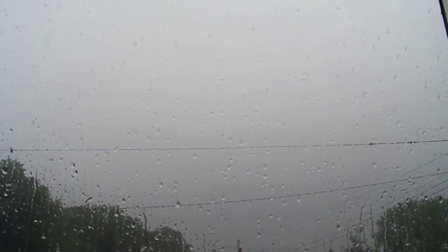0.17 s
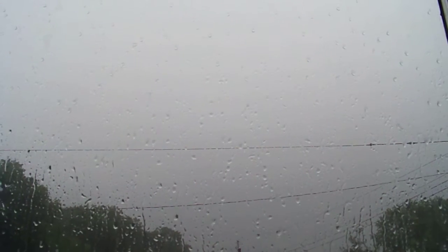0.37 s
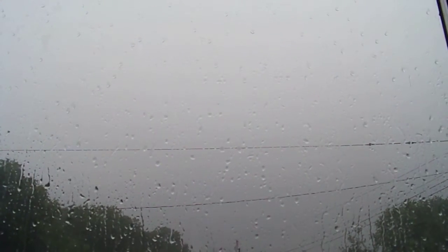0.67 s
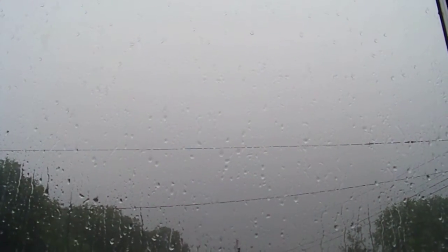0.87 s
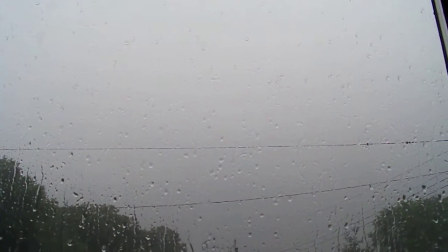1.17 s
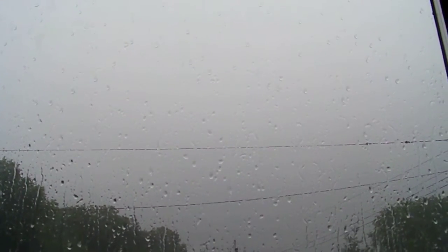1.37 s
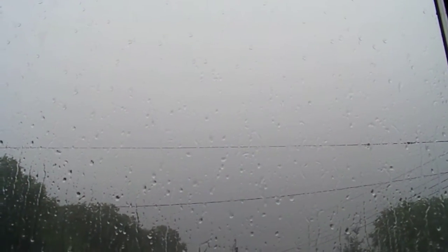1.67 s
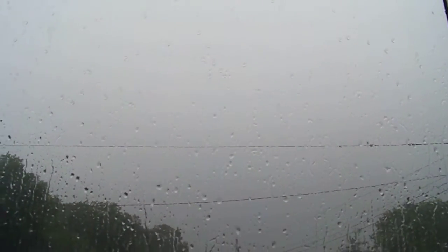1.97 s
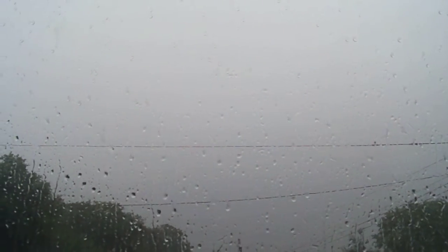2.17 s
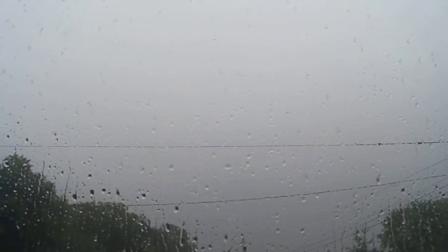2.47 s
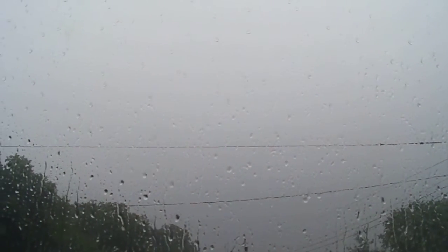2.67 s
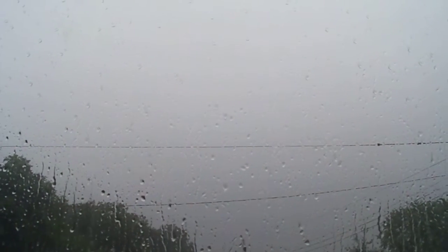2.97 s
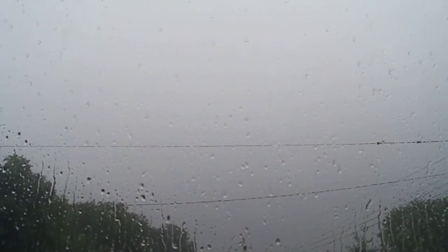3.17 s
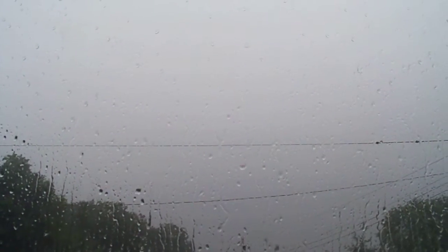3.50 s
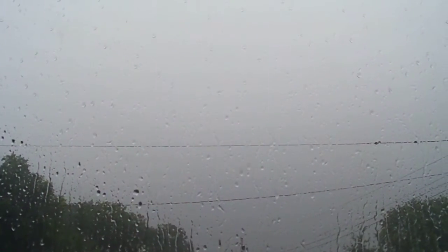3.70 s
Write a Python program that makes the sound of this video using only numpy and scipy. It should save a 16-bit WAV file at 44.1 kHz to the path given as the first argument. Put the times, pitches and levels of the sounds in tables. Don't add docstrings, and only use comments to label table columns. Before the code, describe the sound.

Steady rain on window glass, with low rumbling thunder dying away and scattered heavy drops knocking.

```python
import sys
import numpy as np
from scipy import signal
from scipy.fft import rfft, irfft, next_fast_len
from scipy.io import wavfile
from scipy.ndimage import uniform_filter1d

SR = 44100
rng = np.random.default_rng(int(sys.argv[2]) if len(sys.argv) > 2 else 0)


def store_wav(level_fs):
    pcm = np.round(np.clip(np.atleast_2d(level_fs), -1, 1) * 32767)
    wavfile.write(sys.argv[1], SR, pcm.T.astype(np.int16))


def volts(x):
    e = np.asarray(x, float) / 20
    return 10 ** e


N = 169344

# f/Hz, level per Hz/dB
RAIN_COLOUR = [(110, -29), (190, 0.5), (253, -0.5), (303, -10), (546, -3), (970, -14.5), (1060, -16),
               (2920, -17), (7000, -30), (9100, -65.5), (15400, -120)]


def rms_one(x):
    return x / np.sqrt(np.mean(x ** 2) + 1e-20)


def at_hz(points, hz):
    table = np.array(points)
    return np.interp(np.log(hz), np.log(table[:, 0]), table[:, 1])


def drift(rate_hz):
    hop = 40
    r = np.exp(-2 * np.pi * rate_hz * hop / SR)
    settle = 2000
    slow = signal.lfilter([1], [1, -2 * r, r * r], rng.standard_normal(N // hop + settle + 2))[settle:]
    return np.interp(np.arange(N) / hop, np.arange(len(slow)), rms_one(slow))


def band(x, low_hz, high_hz):
    edges = [low_hz, min(high_hz, .45 * SR)]
    return signal.sosfilt(signal.butter(2, edges, "band", fs=SR, output="sos"), x)


def pan(pan_db):
    return volts(pan_db / 2 * np.array([[1], [-1]]))


def far_rain():
    level_db, patchy_db = -39, 0.78
    out, together = 0, drift(8)
    edges = 150 * 2 ** np.arange(0, 6.1, .5)
    white = rng.standard_normal((2, 2, N))
    for k, (low, high) in enumerate(zip(edges, edges[1:])):
        flicker_db = patchy_db * (0.2 * together + drift(28))
        colour_db = at_hz(RAIN_COLOUR, np.sqrt(low * high))
        out = out + band(white[k % 2], low, high) * volts(colour_db + flicker_db)
    return volts(level_db) * rms_one(out)


def patter():
    drops_per_s, level_db, spread_db, t60_s = 450, -47, 2, 0.045
    out, t = 0, np.arange(SR // 4) / SR
    sizes = volts(spread_db * np.minimum(rng.exponential(size=N), 4))
    hits = sizes * (rng.random(N) < drops_per_s / SR)
    dealt = rng.integers(0, 8, N)
    for k, hz in enumerate(np.geomspace(900, 7000, num=8)):
        noise = rng.standard_normal((2, len(t)))
        tail = band(noise, hz / 1.7, hz * 1.76) * volts(-60 * t / t60_s)
        clicks = (hits * (dealt == k))[None]
        out = out + volts(1.54 * at_hz(RAIN_COLOUR, hz)) * signal.fftconvolve(clicks, tail)[:, :N]
    return volts(level_db) * rms_one(out)


def thunder():
    # t/s, level/dB, upper rumble against lower/dB
    swells = [(0.0, -23, 7), (0.04, -29.5, -4), (0.1, -24.5, 0), (0.2, -32.5, 7.5), (0.35, -29, 0.5),
              (0.39, -25.5, 2.5), (0.79, -35, -1.5), (0.85, -29, -6.5), (1.03, -33.5, -1), (1.85, -35.5, 4),
              (1.87, -34.5, 0.5), (2.26, -37.5, 2), (2.32, -31.5, -2.5), (2.57, -40, -1), (2.64, -32.5, -2),
              (3.04, -43, 0), (3.79, -34, 0.5), (3.84, -34.5, -8)]
    # f/Hz, width/Hz, level/dB
    modes = [(21.8, 5.5, -18.5), (41, 18.7, 2), (69.7, 22, -4), (104.2, 40, -0.5), (131, 30, -8),
             (161.3, 26, -7.5), (197, 31, -35)]
    s, level_db, upper_db = np.transpose(swells)
    t, out = np.arange(N) / SR, 0
    roll_db, tilt_db = np.interp(t, s, level_db), np.interp(t, s, upper_db)
    for hz, width, db in modes:
        r = np.exp(-np.pi * width / SR)
        resonator = [0.98, 0, -1, 1, -2 * r * np.cos(2 * np.pi * hz / SR), r * r]
        noise = signal.sosfilt([resonator] * 2, rng.standard_normal((2, N + SR)))[:, SR:]
        noise = noise / uniform_filter1d(noise ** 2, size=SR // 9) ** .45
        out = out + rms_one(noise) * volts(db - 6 + roll_db + np.log2(hz / 70) * tilt_db)
    return signal.sosfilt(signal.butter(4, 257, fs=SR, output="sos"), out)


def booms():
    # t/s, peak level/dB, f/Hz, time to fall 60 dB/s
    arrivals = [(-.017, -12.5, 44.4, .3), (0.059, -28.5, 43.2, .5), (.25, -28, 103, 0.25),
                (0.291, -26.5, 160, 0.17), (0.372, -21, 40.7, .9), (.371, -25, 95.3, 0.36),
                (.38, -27.5, 159.5, 0.41), (.47, -28, 41, .5), (.74, -36, 161, .3),
                (0.579, -29.5, 109.8, 0.26), (.63, -22.5, 42.8, 0.46), (.67, -32, 166.3, .3),
                (.832, -27.5, 43.9, 0.33), (1.17, -31.5, 105.4, 0.39), (1.3, -32.5, 110.2, 0.31),
                (1.549, -26, 45.4, 0.35), (1.599, -36, 105.5, 0.39), (1.86, -23, 43.3, 0.46),
                (1.95, -33.5, 47.4, .4), (2.02, -29.5, 162, 0.26), (2.11, -39, 247.6, 0.3),
                (2.286, -32.5, 43.8, 0.49), (2.408, -34, 48.3, 0.24), (2.641, -34, 111.2, 0.42),
                (2.661, -34.5, 161.3, 0.22), (3.15, -44, 42.7, 0.36), (3.31, -36.5, 97, 0.28),
                (3.37, -36, 42.6, 0.39), (3.461, -29, 103, 0.32), (3.68, -24.5, 48, 0.45),
                (3.7, -39, 160.5, 0.67), (3.748, -30.5, 106.8, 0.35)]
    rise_cycles, trim_db = 1.72, 4
    out = np.zeros((2, N))
    for s, db, hz, t60 in arrivals:
        t = np.maximum(np.arange(N) / SR - s, 0)
        swell = 1 - np.exp(-t * hz / rise_cycles)
        fall = volts(db + trim_db - 60 * t / max(t60, .1))
        out[0] += np.sin(2 * np.pi * hz * t) * swell * fall
    return out


def mains_hum():
    hum_hz, level_db = 360.8, -56
    strength = volts(level_db + 0.28 * drift(3.5) + np.array([[-1.5], [1.5]]))
    return strength * np.sqrt(2) * np.sin(2 * np.pi * hum_hz * np.arange(N) / SR)


def ringing(rows, trim_db, rise_s, t60_s):
    out, t = np.zeros((2, N + SR)), np.arange(SR // 4) / SR
    envelope = (1 - np.exp(-t / rise_s)) * volts(-60 * t / t60_s)
    for s, db, hz, pan_db in rows:
        main = np.sin(2 * np.pi * hz * t)
        neighbour = np.sin(2 * np.pi * (hz * rng.uniform(0.79, 1.05) * t + rng.random()))
        tone = (main + 0.35 * neighbour) * envelope
        i = int((s - .004) * SR)
        out[:, i:i + len(t)] += tone * volts(db + trim_db) * pan(pan_db)
    return out[:, :N]


def sill_pings():
    # t/s, peak level/dB, f/Hz, left over right/dB
    drips = [(.0997, -40.5, 2970, 10), (.266, -41, 3100, 5), (.938, -41, 1254, -1), (0.77, -42, 980, 4),
             (1.9, -31, 890, -3), (3.24, -31, 740, -1), (3.1, -46, 2800, 4), (0.077, -44, 1440, -2),
             (.646, -38, 2900, 13), (.649, -35, 1050, -7), (.796, -37, 2850, 11), (0.54, -33, 950, -8),
             (.98, -44, 2860, 3), (0.84, -53, 2920, 6), (0.97, -44, 2870, 10), (1.2401, -40, 3100, 5),
             (1.2366, -53, 1290, -11), (1.606, -41, 2400, 17), (1.6003, -33, 1060, -4), (3.5, -45, 2870, 1),
             (2, -51, 5240, 0), (3.4565, -45, 2870, 4)]
    return ringing(drips, trim_db=1, rise_s=.004, t60_s=.07)


def heavy_drops(rows, trim_db, spread, crack_db):
    attack_s, hold_s, crack_t60_s = 0.00067, 0.0056, 0.01
    out, t = np.zeros((2, N + SR)), np.arange(SR // 3) / SR
    for s, db, hz, pan_db, t60 in rows:
        noise = rng.standard_normal((2, len(t)))
        noise[1] = 0.42 * noise[0] + 0.85 * noise[1]
        wide = spread ** min(1, (4600 / hz) ** 2)
        rise = 1 - np.exp(-t / attack_s)
        fall = volts(-60 * np.maximum(t - hold_s, 0) / max(t60, .02))
        crack = 1 + volts(crack_db - 60 * t / crack_t60_s)
        burst = rms_one(band(noise, hz / wide, hz * wide)) * rise * fall * crack
        i = int(s * SR)
        out[:, i:i + len(t)] += burst * volts(db + trim_db) * pan(pan_db)
    return out[:, :N]


def frame_knocks():
    # t/s, peak level/dB, centre f/Hz, left over right/dB, time to fall 60 dB/s
    thuds = [(.099, -30, 1520, -2, 0.078), (.262, -30.5, 2900, 6, 0.043), (.43, -32, 1200, 3, 0.075),
             (.903, -31.5, 1000, -1, 0.15), (.933, -27.5, 1200, 1, 0.14), (1.389, -39, 2500, 0, 0.11),
             (2.251, -29.5, 1600, -1, 0.17), (2.256, -27, 810, 1.5, 0.066), (2.588, -30, 2500, 9, 0.067),
             (2.6, -33, 1110, -3, 0.13), (2.722, -29.5, 1100, 5, 0.076), (3.172, -37, 1300, 3, 0.1),
             (3.235, -30, 850, -1, 0.1), (3.456, -34.5, 2800, 8, 0.088)]
    return heavy_drops(thuds, trim_db=-13.5, spread=1.25, crack_db=-5.5)


def pane_thumps():
    # t/s, peak level/dB, f/Hz, left over right/dB
    big_drops = [(0.164, -35, 551, -4.5), (0.252, -28, 552, -0.5), (0.37, -28.5, 569, -4),
                 (0.793, -36, 494, -4), (0.992, -30, 539, 0.0), (2.085, -33, 534, 0.5),
                 (2.233, -26.5, 517, -1), (2.375, -26.5, 535, -1.0), (2.469, -29.5, 560, -7),
                 (2.525, -26.5, 531, -2), (2.899, -30, 535, 3), (3.232, -31, 558, -4),
                 (3.309, -29, 510, -2), (3.366, -26, 552, 0), (3.443, -35, 544, -2), (3.65, -41, 557, -1.0)]
    return ringing(big_drops, trim_db=-1, rise_s=0.0072, t60_s=0.098)


def glass_splats():
    # t/s, peak level/dB, centre f/Hz, left over right/dB, time to fall 60 dB/s
    splashes = [(.253, -38, 4000, 1.5, 0.13), (.335, -41, 6100, 2.5, 0.16), (.432, -38, 5000, 0, 0.17),
                (.5342, -30, 6700, -2.5, 0.25), (.746, -40.5, 4900, 9, 0.25), (.912, -41, 5040, 1, 0.6),
                (1.076, -37, 4940, 2, 0.35), (1.371, -38.5, 5500, 2, 0.17), (1.451, -38, 5340, 3, 0.097),
                (1.55, -50, 5000, 3, 0.11), (1.668, -39, 4950, 1, 0.045), (1.756, -45, 6460, -10, 0.13),
                (1.8, -50.5, 6400, 18, 0.05), (1.9056, -38.5, 6540, -2, 0.098),
                (1.9824, -37, 5800, 1, 0.093), (2.0916, -42.5, 6600, 8.5, 0.065),
                (2.573, -32, 4830, -1, 0.3), (2.553, -44, 5000, 5, 0.1), (2.765, -50, 5340, -11, 0.034),
                (3.028, -36.5, 4940, 3, 0.15), (3.529, -43, 5770, 8, 0.15), (3.5922, -37.5, 5300, -1, 0.15),
                (3.698, -45, 5270, 2, 0.027), (3.7908, -51, 6000, 3, 0.05)]
    return heavy_drops(splashes, trim_db=-12, spread=1.51, crack_db=7)


def room(x):
    # f/Hz, width/Hz, boost/dB
    peaks = [(247.4, 53, 5.5), (292, 40.4, -22), (446, 13, 1), (477.4, 18, -5.5), (542, 35, 5),
             (700, 51, 1), (865, 55, 4), (1260, 30, 5), (1000, 25, -7.5), (1051, 24, 9.5), (1350, 570, 2),
             (2900, 74, 1), (3220, 20, 0), (1125, 18, 2.5)]
    for hz, width, db in peaks:
        a, w = volts(db / 2), 2 * np.pi * hz / SR
        q = np.sin(w) * width / hz / 2
        middle = -2 * np.cos(w)
        x = signal.lfilter([1 + q * a, middle, 1 - q * a], [1 + q / a, middle, 1 - q / a], x)
    return x


def pair(x):
    # f/Hz, likeness from 0 to 1
    likeness = [(40, .97), (70, .99), (180, .995), (350, .975), (700, .91), (1400, .5), (2800, .12),
                (8000, .1)]
    # f/Hz, left over right/dB
    balance = [(60, 0.5), (250, -1), (1000, -0.5), (1600, -2), (2900, 7.5), (4500, 2.5), (6500, -1.5),
               (8000, -7.5)]
    # f/Hz, lead/s
    left_lead = [(100, .0002), (300, .00015), (600, .00013), (1000, .00011), (2000, .00015)]
    size = next_fast_len(N + 4096)
    hz = np.maximum(np.arange(size // 2 + 1) * SR / size, 1)
    mid, side = rfft(x, size)
    alike = np.clip(at_hz(likeness, hz), 0, 1)
    lean = volts(at_hz(balance, hz) / 2)
    shared, own = np.sqrt(1 + alike) * mid, np.sqrt(1 - alike) * side
    left = (shared + own) * lean * np.exp(2j * np.pi * hz * at_hz(left_lead, hz))
    right = (shared - own) / lean
    return irfft(np.array([left, right]) / np.sqrt(2), size)[:, :N]


def scene():
    rain = room(far_rain() + patter())
    storm = pair(rain + thunder() + booms())
    heavy = room(frame_knocks() + glass_splats())
    rings = sill_pings() + pane_thumps()
    return storm + heavy + rings + mains_hum()


def band_limit(x):
    return signal.sosfilt(signal.butter(12, 8950, fs=SR, output="sos"), x)


def record(dry):
    # f/Hz, level/dB
    top_end = [(6900, 0.5), (7200, -1), (7500, -3.5), (7800, -12.5), (8100, -16.5), (8800, -27.5),
               (9200, -77.5)]
    hiss_db, hiss_top_hz = -64.5, 7820
    both = np.concatenate([dry, dry[:, ::-1]], axis=1)
    hz = np.maximum(np.arange(N + 1) * SR / N / 2, 1)
    dulled = irfft(rfft(both) * volts(at_hz(top_end, hz)))[:, :N]
    low_pass = signal.butter(8, hiss_top_hz, fs=SR, output="sos")
    hiss = signal.sosfilt(low_pass, rng.standard_normal((2, N)))
    return band_limit(dulled + volts(hiss_db) * hiss)


dry = scene()
out = record(dry)
store_wav(out)
```